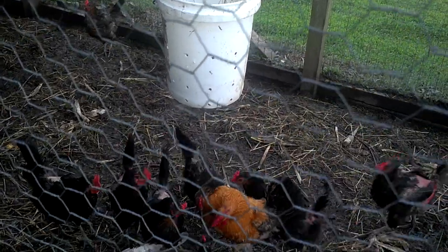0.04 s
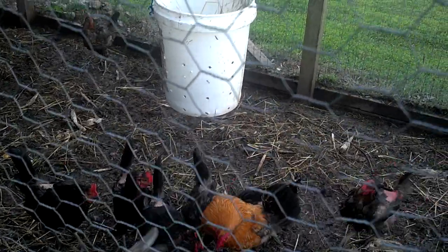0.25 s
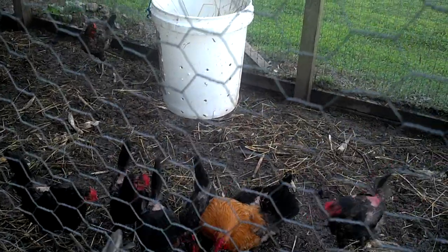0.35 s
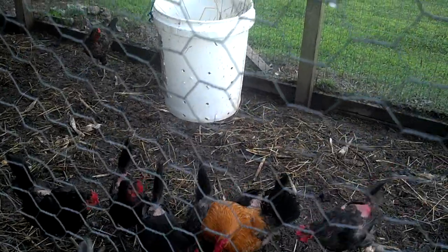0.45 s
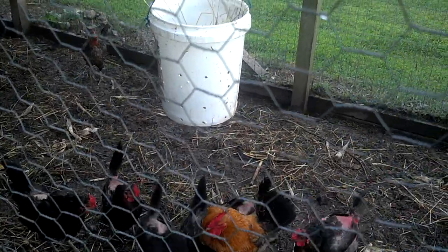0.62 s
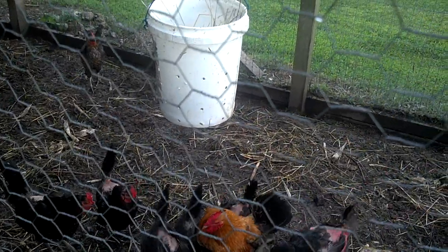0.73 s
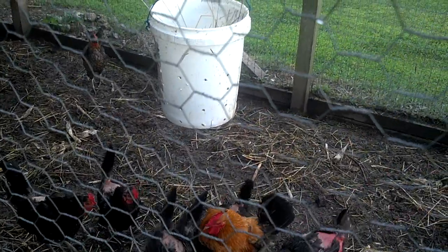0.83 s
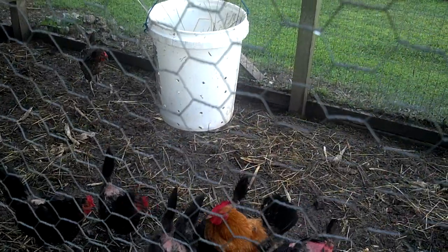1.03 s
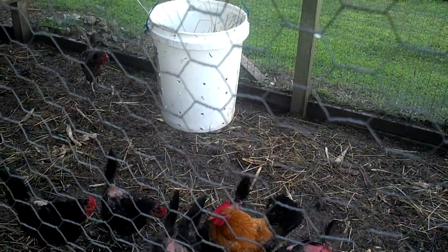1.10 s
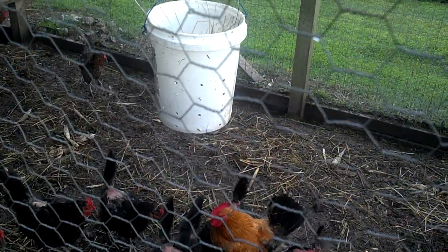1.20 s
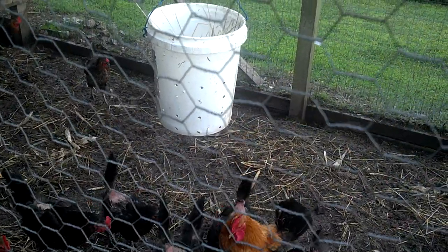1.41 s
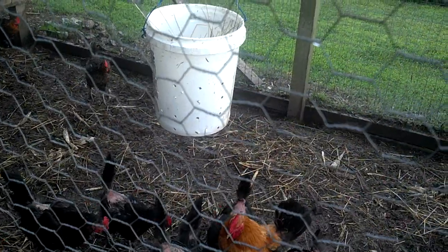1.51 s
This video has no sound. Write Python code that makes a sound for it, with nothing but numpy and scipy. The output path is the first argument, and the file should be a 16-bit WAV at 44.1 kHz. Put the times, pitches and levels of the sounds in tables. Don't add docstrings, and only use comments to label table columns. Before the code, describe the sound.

Hens cluck outdoors over soft distant traffic hum. A near hen gives short hollow clucks at 0.22, 0.37 and 0.58 seconds, rising, the last loudest. A mellow hen clucks at 0.81, 0.98 and 1.19, with a low grunt at 0.83 and faint hoarse far calls. A songbird whistles downward about every quarter second from 0.25; another chips upward at 0.64 and 1.27. Straw rustles and ticks throughout.

```python
import sys
import numpy as np
from scipy import signal
from scipy.fft import rfft, irfft, next_fast_len
from scipy.io import wavfile
from scipy.ndimage import uniform_filter1d, map_coordinates

SR = 44100
rng = np.random.default_rng(int(sys.argv[2]) if len(sys.argv) > 2 else 0)


def dump(signal):
    limited = np.clip(np.atleast_2d(signal).T, -1, 1)
    pcm = np.round(limited * 32767).astype(np.int16)
    wavfile.write(sys.argv[1], SR, pcm)


def boost_factor(decibels):
    exponent = np.asarray(decibels, float) / 20
    return 10 ** exponent


N = 68355


def unit(x):
    return x / np.sqrt(np.mean(x ** 2) + 1e-20)


def along(points, hz):
    f, v = np.transpose(points)
    return np.interp(np.log(hz + 1), np.log(f + 1), v)


def wobble(rate_hz, size=N):
    knots = rng.standard_normal(int(size * rate_hz / SR) + 4)
    return map_coordinates(knots, [np.arange(size) * rate_hz / SR])


def filtered(x, response):
    m = next_fast_len(x.shape[-1] + 4096)
    spectrum = rfft(x, m) * response(np.fft.rfftfreq(m, 1 / SR))
    return irfft(spectrum, m)[..., :x.shape[-1]]


def band(x, hz, width_hz):
    return unit(filtered(x, lambda f: np.exp(-((f - hz) / width_hz) ** 2 * 2)))


def add(track, s, sound):
    part = track[max(round(s * SR), 0):][:len(sound)]
    part += sound[:len(part)]


def placed(x, bass_lead_s, treble_lead_s, pan_db, wet_db):
    # f/Hz, t60/s
    yard = [(300, .08), (900, .13), (3500, .15), (7000, .2), (7900, .33), (9500, .12), (15000, .1)]
    bass_path_hz, yard_delay_s = 520, .004
    side = np.array([[.5], [-.5]])

    def path(f):
        lead_s = treble_lead_s + (bass_lead_s - treble_lead_s) / (1 + (f / bass_path_hz) ** 4)
        return boost_factor(pan_db * side) * np.exp(2j * np.pi * f * lead_s * side)

    hz, t, z = signal.stft(rng.standard_normal((2, SR // 2)), SR, nperseg=256)
    decay = boost_factor(-60 * t / along(yard, hz)[:, None])
    tail = signal.istft(z * decay, SR, nperseg=256)[1]
    tail = tail / np.linalg.norm(tail[0])
    late = np.pad(x, (round(yard_delay_s * SR), 0))[None]
    return filtered(x, path) + boost_factor(wet_db) * signal.fftconvolve(late, tail, axes=1)[:, :N]


def background():
    # f/Hz, density/dB
    hum = [(30, -2), (80, 4), (150, 3), (230, -2), (420, -14), (750, -11), (1050, -17), (1600, -16)]
    # f/Hz, density/dB
    air = [(1600, -16), (2300, -23), (3500, -30), (5000, -35.5), (7000, -37), (9000, -42.5), (15500, -38)]
    # f/Hz, correlation
    alike = [(200, .975), (450, .7), (750, .85), (1100, .3), (2000, .05)]
    level_db, patchy_db, swell_db = -39, 1.8, .7
    pan_db, lag_rad, pan_top_hz = -2.2, -.02, 900
    z = signal.stft(rng.standard_normal((2, N)), nperseg=512)[2]
    patches = uniform_filter1d(uniform_filter1d(rng.standard_normal(z.shape[1:]), 5, 0), 8, 1)
    pair = signal.istft(z * boost_factor(patchy_db * unit(patches)), nperseg=512)[1][:, :N]

    def mid_side(hz):
        turn = np.arccos(np.clip(along(alike, hz), -1, 1)) / 2
        return boost_factor(along(hum + air[1:], hz)) * [np.cos(turn), np.sin(turn)]

    def to_right(hz):
        share = np.array([[.5], [-.5]]) / (1 + (hz / pan_top_hz) ** 4)
        return (boost_factor(pan_db) * np.exp(-1j * lag_rad)) ** share

    mid, side = filtered(pair, mid_side)
    field = unit(filtered(np.array([mid + side, mid - side]), to_right))
    return boost_factor(level_db + swell_db * wobble(6)) * field


def far_hen():
    # t/s, length/s, level/dB, f/Hz, width/Hz
    calls = [
        (.82, .13, -46, 1600, 300),
        (.6, .1, -46, 850, 140),
        (1.29, .05, -48, 720, 120),
        (.88, .04, -54, 2150, 150),
        (.075, .04, -42, 190, 60),
    ]
    out = np.zeros(N)
    for s, length_s, db, hz, width_hz in calls:
        n = round(length_s * SR)
        add(out, s, boost_factor(db) * np.hanning(n) ** .5 * band(rng.standard_normal(n), hz, width_hz))
    return out


def falling_bird():
    # end t/s, level/dB
    whistles = [
        (.277, -45),
        (.609, -42.5),
        (.864, -46),
        (1.111, -45),
        (1.363, -46),
    ]
    length_s, from_hz, to_hz, swell_db, end_s = .053, 4900, 3250, 32, .008
    out, t = np.zeros(N), np.arange(round(length_s * SR)) / SR
    hz = from_hz * (to_hz / from_hz) ** (t / length_s)
    stop = np.sin(np.pi / 2 * np.clip((length_s - t) / end_s, 0, 1))
    shape = boost_factor(swell_db * (t / length_s - 1)) * stop
    tone = shape * np.sin(2 * np.pi * np.cumsum(hz) / SR)
    for end, db in whistles:
        add(out, end - length_s, boost_factor(db + 2.5 * wobble(150, size=len(t))) * tone)
    return out


def rising_bird():
    # t/s, level/dB, top f/Hz
    chips = [
        (.6385, -51, 8000),
        (1.268, -43.5, 7900),
    ]
    # delay/s, level/dB
    echoes = [
        (.003, -5),
        (.008, -5),
        (.0125, -12),
        (.018, -12),
        (.024, -16),
    ]
    from_hz, rise_s, length_s, fade_db, rough_db = 5300, .007, .034, 13, 4
    out, t = np.zeros(N), np.arange(round(length_s * SR)) / SR
    for s, db, top_hz in chips:
        hz = top_hz - (top_hz - from_hz) * np.exp(-(t / rise_s) ** 1.4)
        fade = boost_factor(-fade_db * t / length_s + rough_db * wobble(600, size=len(t)))
        shape = signal.windows.tukey(len(t), .25) * fade
        chip = boost_factor(db) * shape * np.sin(2 * np.pi * np.cumsum(hz) / SR)
        add(out, s, chip)
        n = len(t) // 4
        for late_s, echo_db in echoes:
            add(out, s + late_s, boost_factor(echo_db) * chip[:n] * np.hanning(n))
    return out


def rustles():
    # middle t/s, length/s, level/dB, centre f/Hz, width/Hz
    swells = [(.1, .04, -62, 12000, 5000), (.15, .05, -57, 14000, 5000), (.32, .09, -61, 14500, 3500),
              (.33, .09, -58, 6500, 3500), (.515, .06, -59, 9000, 9000), (.89, .06, -56, 12500, 5000),
              (.945, .05, -54, 6800, 3000), (.95, .04, -61, 13000, 5000), (1.01, .04, -61, 8500, 6000),
              (1.32, .07, -65, 14500, 3000), (.232, .018, -52, 6000, 9000), (.593, .022, -44, 2600, 1300),
              (.592, .022, -50, 9000, 12000), (.593, .02, -50, 6600, 1800), (.6, .04, -56, 11700, 600),
              (.382, .016, -58, 8000, 1500)]
    grains_hz, grain_db = 1500, 4
    out = np.zeros((2, N))
    for s, length_s, db, hz, width_hz in swells:
        n = round(length_s * SR)
        sizes = boost_factor(grain_db * wobble(grains_hz, size=n))
        for port in out:
            grains = band(sizes * rng.standard_normal(n), hz, width_hz)
            add(port, s - length_s / 2, boost_factor(db) * np.hanning(n) * grains)
    return out


def ticks():
    # t/s, level/dB, centre f/Hz, width/Hz, t60/s
    cracks = [(.1425, -41, 10000, 16000, .012), (.185, -56, 11000, 4000, .008),
              (.2932, -44, 7000, 3000, .012), (.2932, -52, 12000, 8000, .01), (.6855, -52, 4700, 700, .03),
              (.4325, -41, 14500, 6000, .008), (.4325, -54, 6000, 6000, .006),
              (.6833, -44, 7000, 3500, .05), (.6885, -48, 11500, 7000, .02), (.733, -55, 8500, 2500, .008),
              (1.0834, -57, 7000, 3000, .01), (1.1139, -60, 7500, 3000, .01), (1.3, -45, 3700, 1800, .012),
              (1.502, -58, 13000, 5000, .01), (.353, -54, 4700, 900, .03), (.282, -57, 7000, 2500, .008),
              (.366, -57, 7000, 3000, .008)]
    out, t = np.zeros(N), np.arange(SR // 12) / SR
    for s, db, hz, width_hz, t60_s in cracks:
        shape = boost_factor(db - 60 * t / t60_s + 3.5 * wobble(700, size=len(t)))
        add(out, s, shape * band(rng.standard_normal(len(t)), hz, width_hz))
    return out


def throat_rings(rows):
    out, t = np.zeros(N), np.arange(SR // 8) / SR
    for s, db, hz, rise_s, t60_s in rows:
        decay = boost_factor(db - 60 * t / t60_s + 3 * wobble(200, size=len(t)))
        add(out, s, decay * (1 - np.exp(-t / rise_s)) * np.sin(2 * np.pi * hz * t))
    return out


def voiced(clucks, voice):
    (attack_s, swell_s, t60_s, excess, excess_s, sag, rough,
     width_hz, throat_db, tilt_db, breath_db) = voice
    effort_db, throat_grows = -28, 1.1
    beak_hz, breath_hz, breath_width_hz = 1900, 1100, 1500
    onset_push = 1.4
    out, t, k = np.zeros(N), np.arange(SR // 10) / SR, np.arange(1, 10)[:, None]
    for s, hz, hold_s, db, throat_hz in clucks:
        pitch = hz * (1 + excess * np.exp(-t / excess_s) - sag * np.minimum(t - hold_s / 2, hold_s))
        phase = 2 * np.pi * np.cumsum(pitch) / SR
        fade = boost_factor(-60 * np.maximum(t - hold_s, 0) / t60_s)
        resonance = 1 / (1 + (2 * (k * pitch - throat_hz) / width_hz) ** 2)
        ring = boost_factor(throat_db + throat_grows * (db - effort_db)) * resonance
        ring = ring * (1 - np.exp(-(t / swell_s) ** 2))
        gains = boost_factor(tilt_db * np.log2(k)) * (1 + ring) / np.sqrt(1 + (k * pitch / beak_hz) ** 6)
        opening = 1 - np.exp(-(t / attack_s) ** 2)
        shake = 1 + rough * np.array([wobble(hz, size=len(t)) for _ in k])
        shake[0] += onset_push * (pitch / hz - 1).clip(0) * 2
        starts = 2 * np.pi * rng.random(k.shape) * (k > 1)
        tone = (gains * opening * shake * np.sin(k * phase + starts)).sum(0)
        tone = tone / np.sqrt((gains[:, round(hold_s * SR)] ** 2).sum() / 2)
        breath = band(rng.standard_normal(len(t)) * (1 + np.sin(phase)), breath_hz, breath_width_hz)
        add(out, s, boost_factor(db) * fade * (tone + boost_factor(breath_db) * opening * breath))
    return out




def low_hen():
    # t/s, pitch/Hz, hold/s, level/dB, throat f/Hz
    clucks = [
        (.8345, 158, .0155, -22, 350),
    ]
    voice = (.006, .011, .025, .01, .004, -6, .2, 220, 16, -9, -30)
    return voiced(clucks, voice)


def mellow_hen():
    # t/s, pitch/Hz, hold/s, level/dB, throat f/Hz
    clucks = [
        (.8143, 487, .012, -30, 500),
        (.978, 505, .019, -30, 500),
        (1.194, 483, .014, -33, 500),
    ]
    voice = (.0015, .002, .028, .06, .006, 2, .2, 300, 8, -17, -12)
    # t/s, level/dB, f/Hz, rise/s, t60/s
    rings = [
        (.8145, -27, 900, .0003, .014),
        (.8245, -27, 950, .0003, .018),
    ]
    return voiced(clucks, voice) + throat_rings(rings)


def bright_hen():
    # t/s, pitch/Hz, hold/s, level/dB, throat f/Hz
    clucks = [
        (.2246, 337, .0145, -28.5, 670),
        (.3715, 372, .013, -25.5, 1110),
        (.5843, 394, .0152, -20, 1190),
    ]
    voice = (.0012, .006, .017, .14, .003, 1.2, .18, 200, 13, -6.5, -10.5)
    # t/s, level/dB, f/Hz, rise/s, t60/s
    rings = [(.2255, -28, 1050, .001, .03), (.229, -34, 1650, .005, .08), (.372, -25, 480, .001, .035),
             (.3725, -30, 1600, .002, .05), (.5843, -17.5, 570, .001, .022), (.586, -28, 1800, .002, .05),
             (.24, -34, 690, .003, .08), (.242, -38, 1320, .003, .06), (.387, -28, 740, .003, .05),
             (.596, -21, 740, .003, .035), (.606, -33, 850, .004, .12)]
    return voiced(clucks, voice) + throat_rings(rings)


def scene():
    hen_wet_db, bird_wet_db, straw_wet_db = -12, -7, -13
    mix = background()
    mix = mix + placed(far_hen(), -.00018, -.00018, -1.2, bird_wet_db)
    mix = mix + placed(falling_bird(), -.00005, -.00005, -9, bird_wet_db)
    mix = mix + placed(rising_bird(), .00002, .00002, 9, bird_wet_db)
    mix = mix + rustles()
    mix = mix + placed(ticks(), .00002, .00002, 5, straw_wet_db)
    mix = mix + placed(low_hen(), -.00022, -.0002, -5, hen_wet_db)
    mix = mix + placed(mellow_hen(), .00047, .0002, 1.8, hen_wet_db)
    return mix + placed(bright_hen(), .00042, .00016, 1.5, hen_wet_db)


def roll_off(x):
    return signal.sosfilt(signal.butter(12, 17040, fs=SR, output="sos"), x)


def record(dry):
    low_cut_hz, top_hz, top_drop_db, end_hz = 78, 15800, -22, 16550
    cross_samples, cross_share = 16, .99

    def response(hz):
        edge = np.where(hz < top_hz, 1, boost_factor(top_drop_db)) * (hz < end_hz)
        return edge / np.sqrt(1 + (low_cut_hz / (hz + 1)) ** 8)

    ports = filtered(dry, response)
    crossed = np.pad(ports[::-1], ((0, 0), (cross_samples, 0)))[:, :N]
    return roll_off(ports - cross_share * crossed)


dry = scene()
out = record(dry)
dump(out)
```